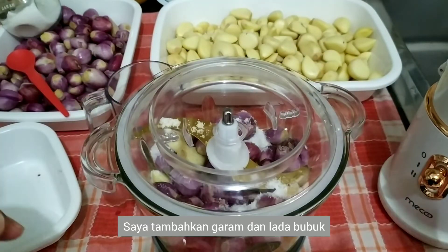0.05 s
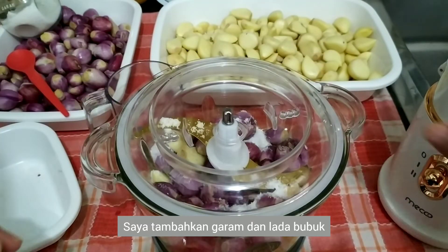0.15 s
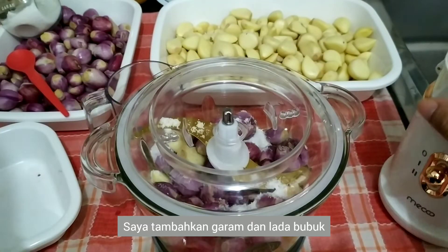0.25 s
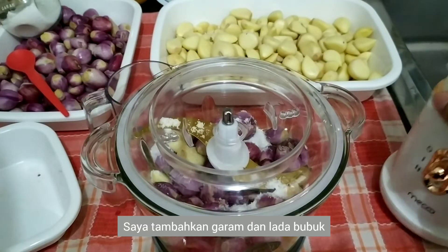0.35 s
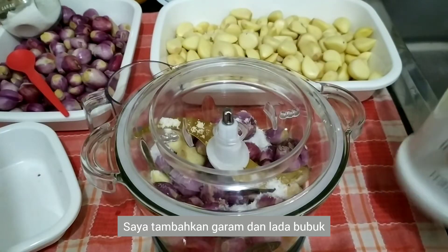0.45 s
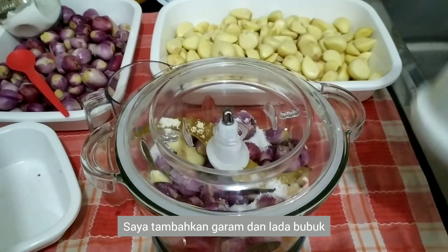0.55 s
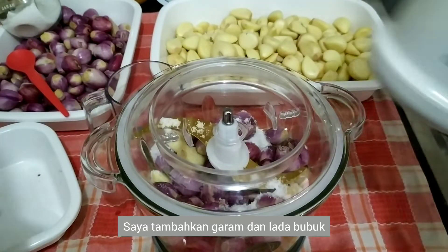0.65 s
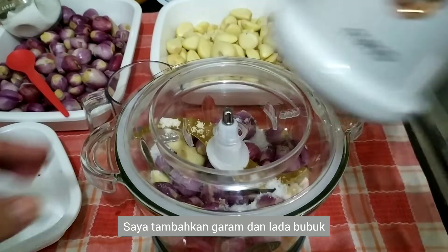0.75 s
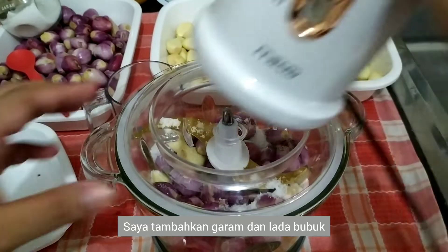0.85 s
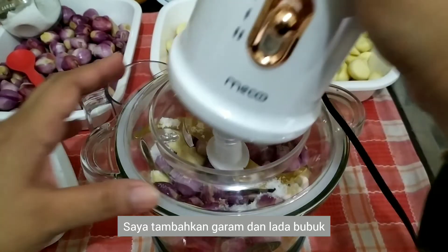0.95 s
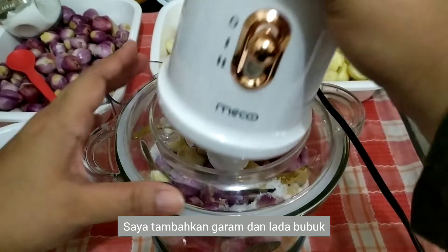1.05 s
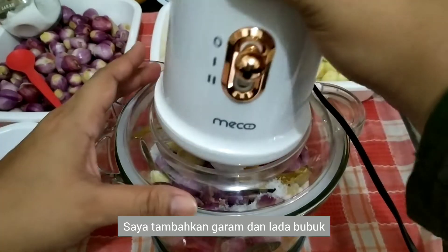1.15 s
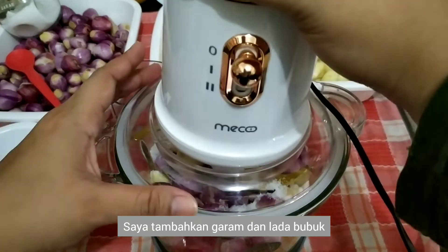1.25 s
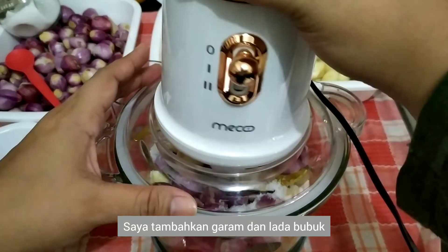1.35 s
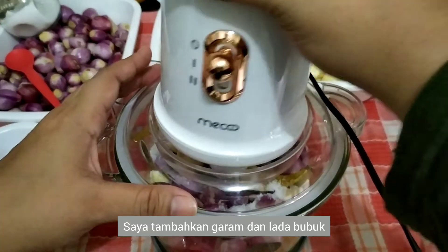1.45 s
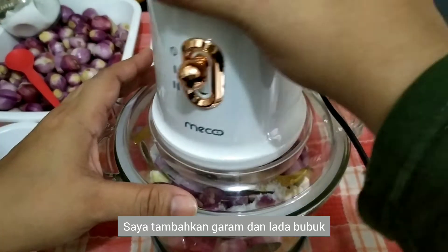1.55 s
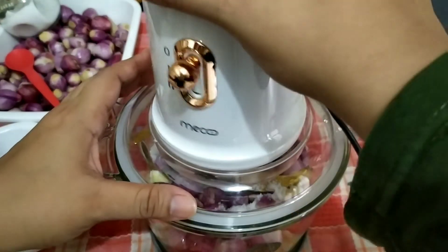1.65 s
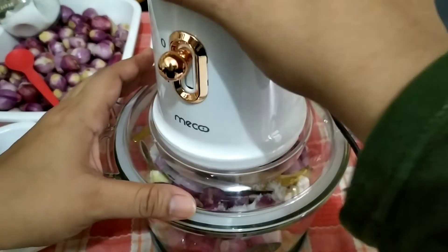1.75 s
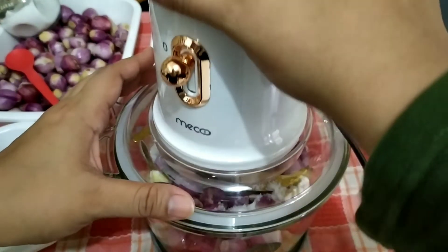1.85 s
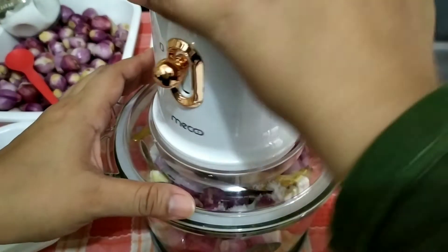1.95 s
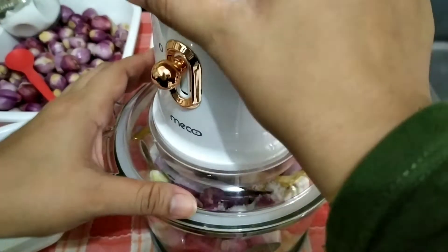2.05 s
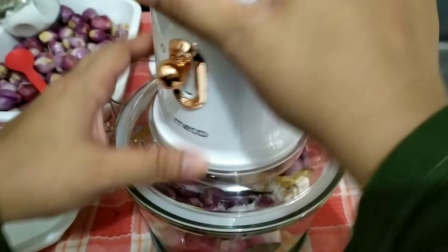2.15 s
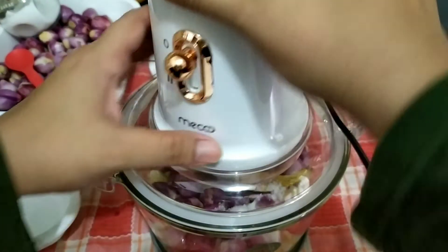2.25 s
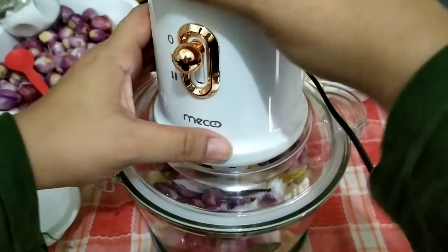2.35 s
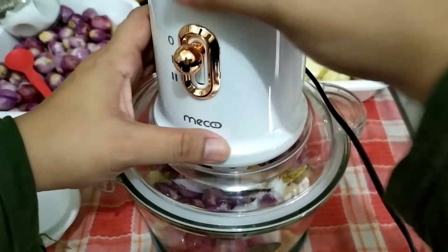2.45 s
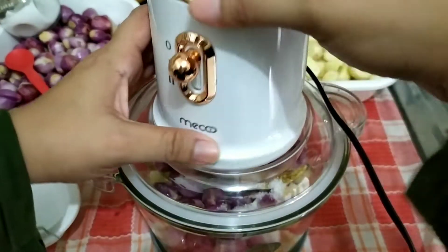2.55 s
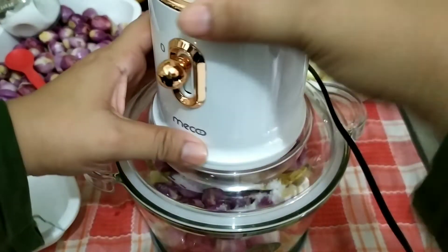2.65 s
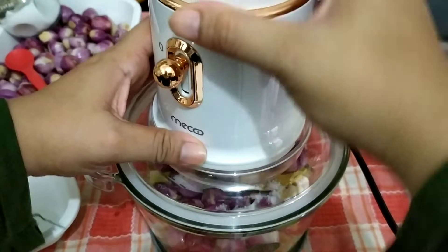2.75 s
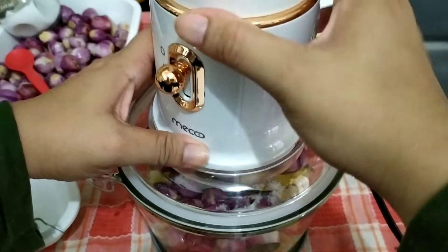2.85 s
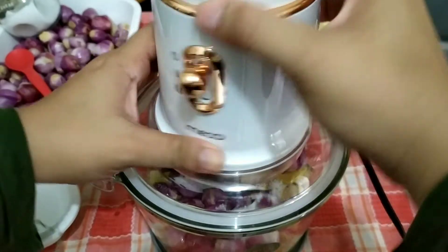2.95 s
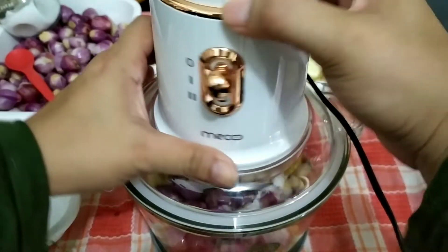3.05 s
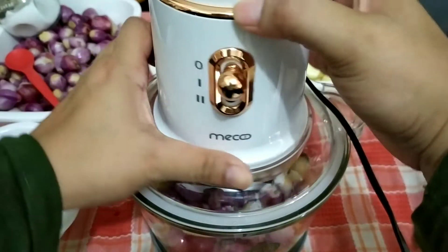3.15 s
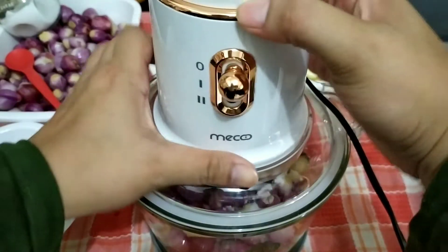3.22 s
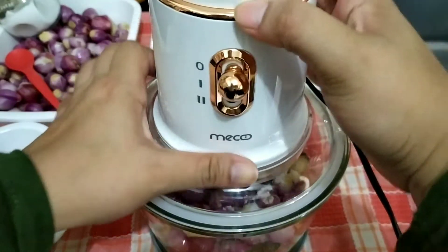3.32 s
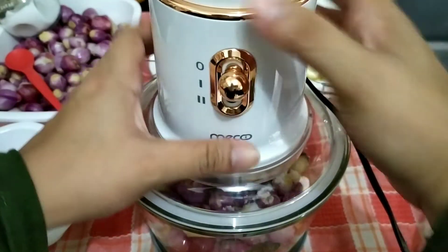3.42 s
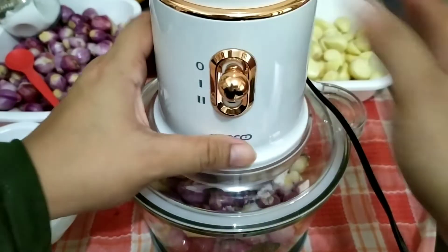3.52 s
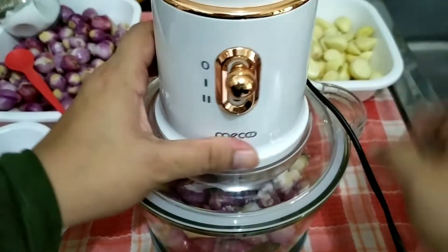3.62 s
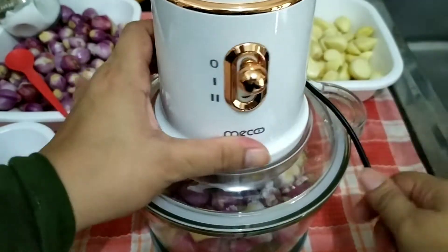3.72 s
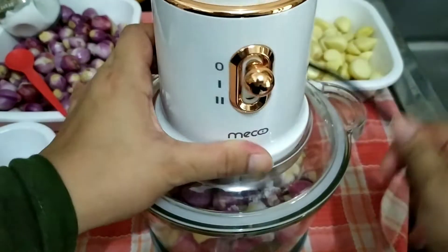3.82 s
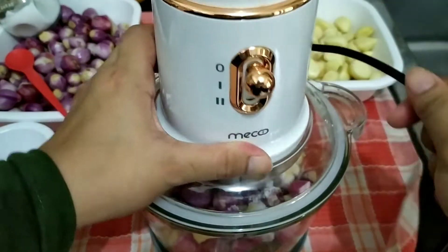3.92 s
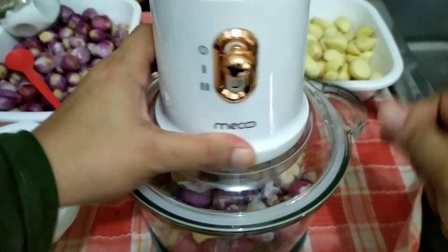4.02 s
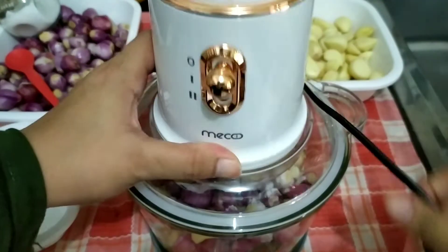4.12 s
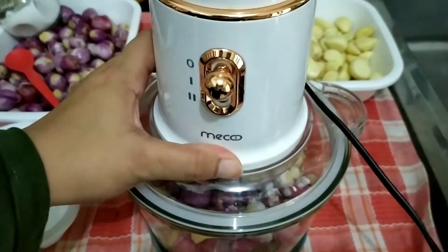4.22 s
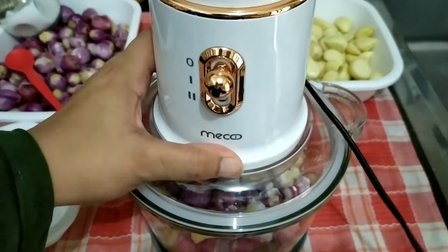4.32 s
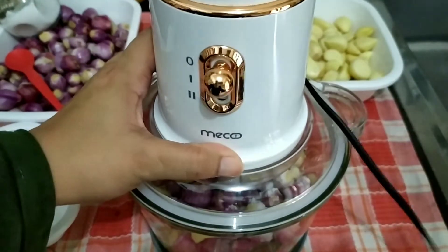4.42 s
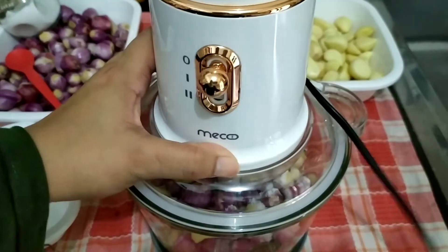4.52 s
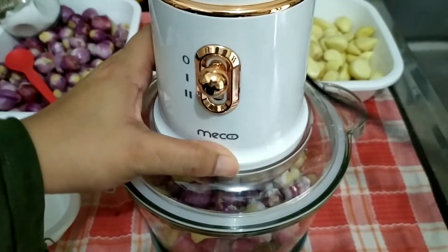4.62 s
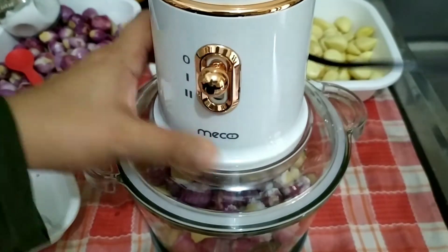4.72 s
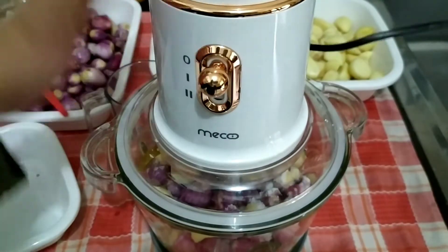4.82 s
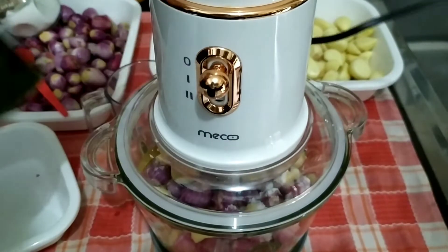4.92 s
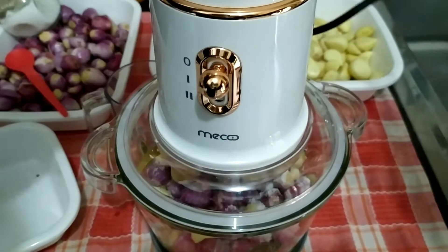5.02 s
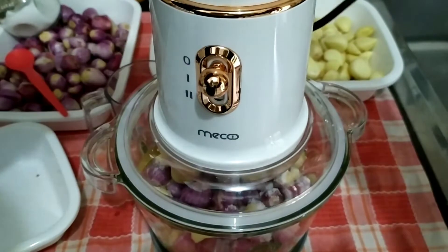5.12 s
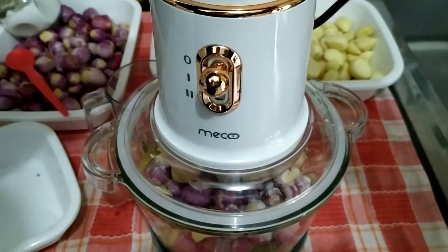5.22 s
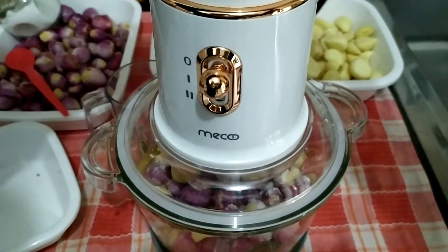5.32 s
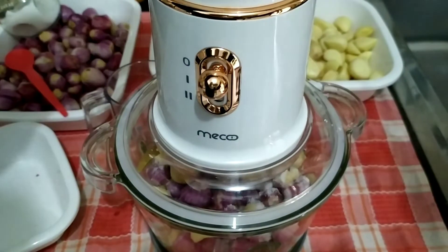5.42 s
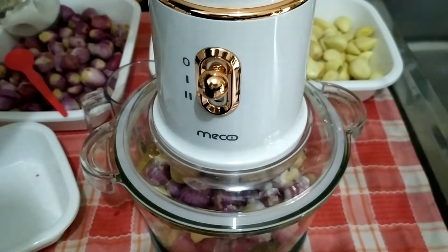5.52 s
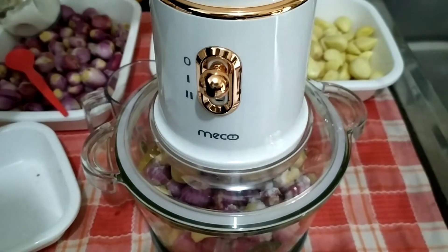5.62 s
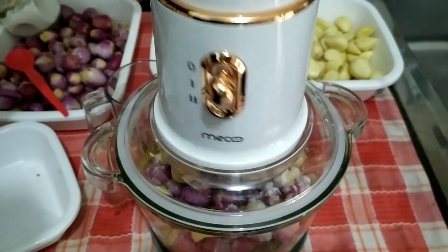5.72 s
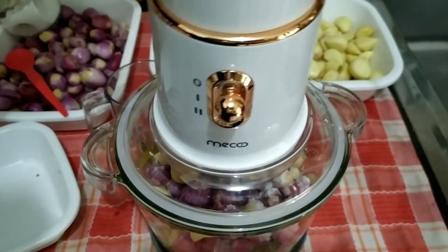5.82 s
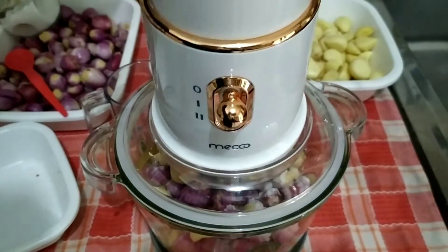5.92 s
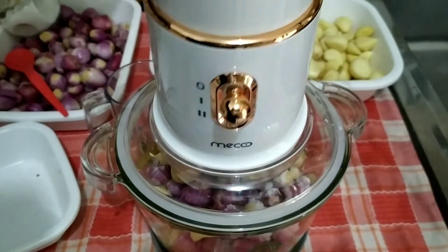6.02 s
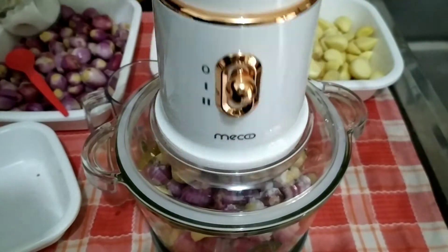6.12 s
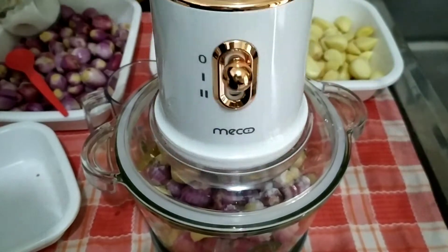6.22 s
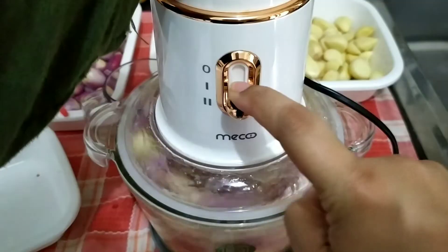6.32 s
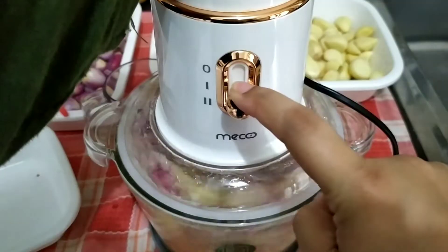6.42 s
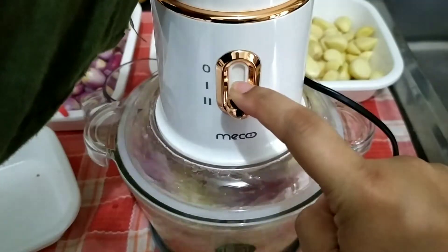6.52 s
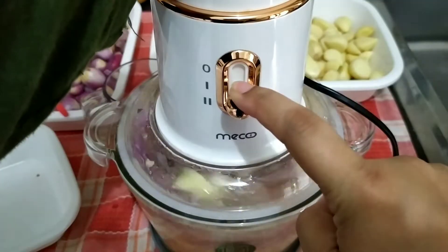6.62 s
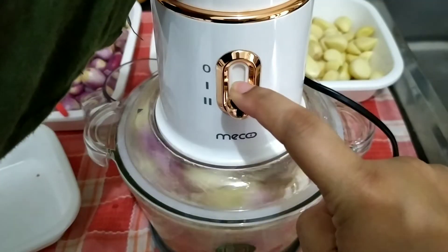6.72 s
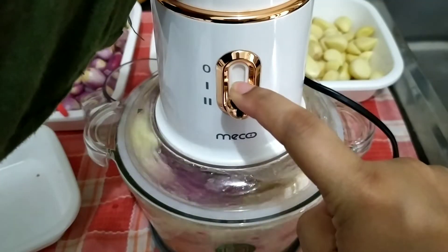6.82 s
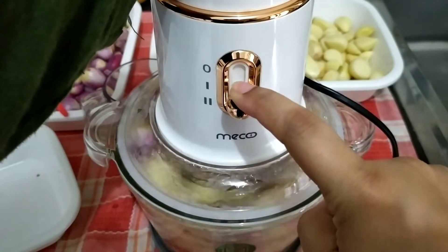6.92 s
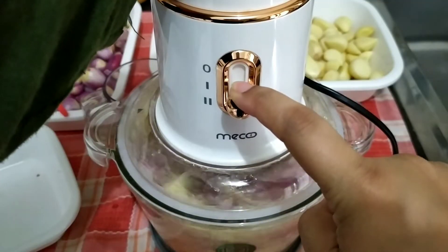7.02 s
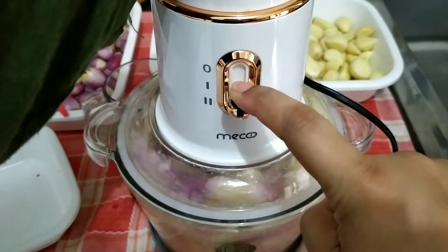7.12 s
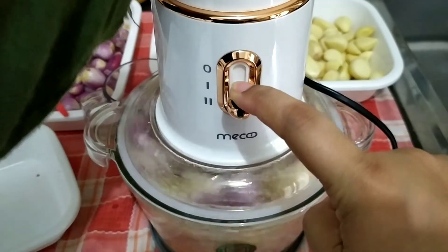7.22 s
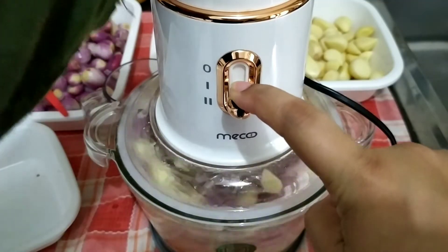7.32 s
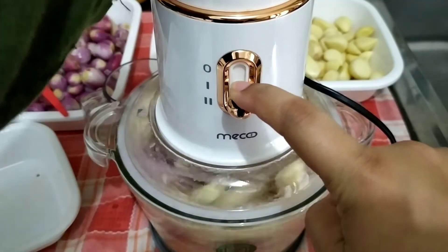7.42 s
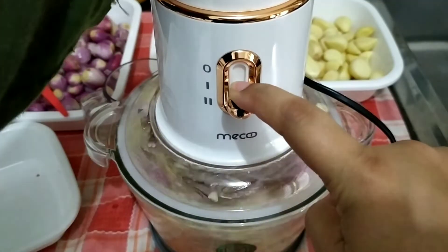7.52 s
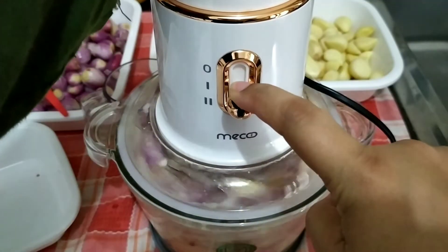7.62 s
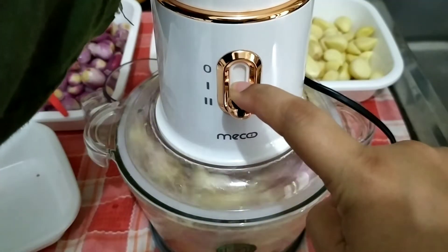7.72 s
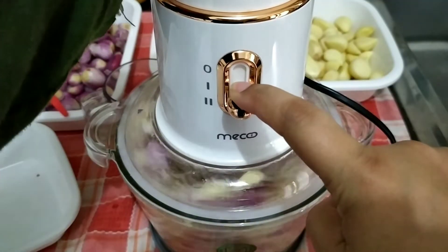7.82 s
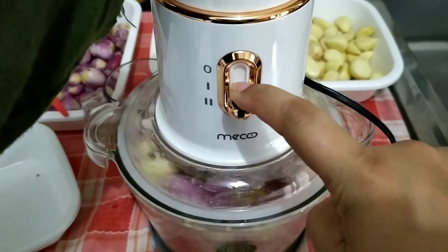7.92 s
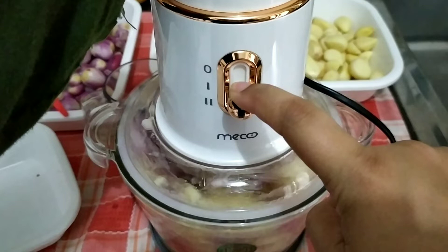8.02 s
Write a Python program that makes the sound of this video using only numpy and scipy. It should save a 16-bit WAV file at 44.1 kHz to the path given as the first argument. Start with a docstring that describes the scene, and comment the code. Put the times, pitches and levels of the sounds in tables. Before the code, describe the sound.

In a small kitchen with a faint mains hum, a plastic motor head is set on the lid of a glass bowl and twisted into place with close knocks, clacks and ticks. A finger squeaks faintly on it and a sleeve brushes by. After about six seconds a switch clicks and the electric chopper starts, its gears rasping while shallots and garlic rumble and pelt the bowl for the last two seconds.

```python
"""An electric chopper flings shallots and garlic round its glass bowl: a rumble and a pelting that
ease as the pieces shrink, over the rasp of the gears. It runs for the last two seconds or so.
Leading up to it, the plastic motor head is lifted, set on the lid and twisted until it seats: its wall
knocks and ticks, a finger squeaks on it, a sleeve brushes by, and the switch is pushed down.
Underneath lies a small kitchen, with still air, a faint mains hum and short echoes of the knocks."""
import sys
import numpy as np
from scipy import signal
from scipy.fft import rfft, irfft, next_fast_len
from scipy.io import wavfile

SR = 44100
rng = np.random.default_rng(int(sys.argv[2]) if len(sys.argv) > 2 else 0)


def put_to_file(sound):
    """Save the sound as 16-bit audio at rate SR, in the file named by the first command-line argument."""
    columns = np.atleast_2d(sound).T  # one column per channel
    safe = np.clip(columns, -1, 1)
    whole_steps = np.round(safe * 32767)
    wavfile.write(sys.argv[1], SR, whole_steps.astype(np.int16))


N = 355446
TIME = np.arange(N) / SR

# Levels are relative: each layer adds its own trim.
# room tone: f/Hz, level/dB
AIR_EQ = [(20, -26.5), (35, -19.5), (48, -0.5), (66, -9.5), (86, 3), (104, -4.5), (122, -11.5),
          (350, -15.5), (700, -15), (1200, -19.5), (3000, -22.5), (5500, -26.5), (7000, -34.5), (8300, -47),
          (10000, -63.5)]
# mains harmonics: f/Hz, level/dB
HUM = [(100, -65), (150, -79.5), (200, -86.5), (250, -77.5), (300, -82.5), (350, -78), (400, -90.5),
       (450, -77), (600, -84.5), (700, -80.5)]
# reverb decay: f/Hz, t60/s
KITCHEN_DECAY = [(120, 0.89), (320, 0.24), (840, 0.48), (2200, 0.36), (5800, 0.37), (9000, 0.3)]
# how well the small parts radiate into the room: f/Hz, gain/dB
SEND_EQ = [(100, -1), (300, -3), (700, 3.5), (1500, -1), (3000, 1.5), (8000, -1.5)]
# the room tone, heard almost in mono: f/Hz, left-right likeness
ROOM_TONE_LIKENESS = [(100, 0.99), (400, 0.73), (900, 0.96), (3000, 0.79), (9000, 0.86)]
# image of sound that fills the room: f/Hz, left-right likeness
ROOM_IMAGE = [(60, .9), (140, .96), (350, .8), (850, .6), (1600, .45), (3000, .3), (9000, .38)]
# image of close clacks and ticks: f/Hz, left-right likeness
CLOSE_IMAGE = [(300, 0.91), (1400, 0.93), (3000, 0.9), (8000, 0.37)]
# microphone balance: f/Hz, left minus right/dB
BALANCE = [(60, -0.5), (160, -0.8), (450, -0.9), (1200, -1.7), (3400, 0), (9000, 0.5)]

# head, lid and bowl ringing together on the table: f/Hz, level/dB, t60/s
BODY_MODES = [(97, -27, .12), (170, -15, .07), (200, -11, .1), (285, -7, .05), (330, 0, .018),
              (385, -11, .07), (440, -3, .016), (490, -16, .06), (575, -25, .05)]
# the plastic wall: multiple of its pitch, level/dB, t60/s
WALL_MODES = [(.5, 12.5, 0.014), (.76, 9.5, 0.0064), (.9, 4, 0.023), (0.999, 20, 0.018),
              (1.131, 1.5, 0.067), (1.4, 5.5, 0.041), (1.68, -1.5, 0.037)]
# a padded blow favours the middle modes: f/Hz, level/dB
THUD_EQ = [(50, -22), (110, -10), (190, 0), (480, 0), (640, -8), (950, -19), (2500, -30)]
# edge striking edge: f/Hz, level/dB
TICK_EQ = [(300, 10), (800, -7), (1500, -5), (2500, 0.5), (3600, 0), (5200, 1.5), (6500, -6.5),
           (7600, -18.5), (9300, -32), (10200, -72)]
# brushing cloth: f/Hz, level/dB
CLOTH_EQ = [(200, 12), (1000, 0.5), (2500, 0.5), (4500, 0.5), (6300, -3.5), (7600, -14), (9300, -32),
            (10200, -58)]

# hands, sleeve and cord brush past, and the lifted head scrapes: t/s, length/s, level/dB
BRUSHES = [(0.266, 0.044, -60), (0.372, 0.01, -48.5), (1.556, 1, -65), (2.312, 0.4, -61.5),
           (3.34, 0.11, -66.5), (4.027, 0.14, -58), (5.446, 0.49, -62.5), (5.87, 0.044, -57.5)]
# a finger slides on the housing: t/s, length/s, level/dB, f/Hz
SQUEAKS = [(2.116, 0.14, -62.5, 3950), (2.293, .05, -59.5, 3100), (2.395, 0.077, -60.5, 2850),
           (2.476, 0.043, -62, 2700)]
RUB_ATTACK_S, RUB_RELEASE_S = 0.027, 0.038
# a plastic edge catches and lets go: t/s, level/dB
TICKS = [(.278, -66), (.377, -50), (.421, -48), (0.46, -59), (.684, -61.5), (1.595, -57.5), (1.861, -59.5),
         (2.492, -52.5), (2.728, -60.5), (3.436, -62.5), (3.542, -59), (4.204, -58.5), (4.568, -63.5),
         (5.804, -44), (5.8868, -49.5), (6.209, -56.5)]
# the palm bumps and the bowl shifts on the tablecloth: t/s, level/dB
BUMPS = [(1.204, -44), (2.196, -38), (2.208, -36.5), (2.335, -34), (2.641, -43.5), (5.788, -42),
         (5.803, -33), (5.825, -37), (5.8855, -31), (6.209, -43)]
# head, lid, cord and switch knock together: t/s, force/dB, brightness/dB, wall pitch/Hz
KNOCKS = [(0.365, -50.5, 8, 1620), (.997, -47.5, -14.5, 1470), (1.642, -43.5, -12.5, 1280),
          (1.716, -48, 8, 1230), (1.9614, -44.5, -12, 1340), (2.2212, -37, -15, 1594),
          (2.351, -34, -14, 1574), (2.571, -44, -21.5, 1590), (2.764, -57, -4, 1450),
          (3.066, -45.5, -18.5, 1340), (3.128, -53, -1, 1550), (3.323, -58.5, 1, 1480),
          (3.641, -54, -0.5, 1280), (4.02, -45, -18.5, 1290), (4.075, -55, -19, 1280),
          (4.134, -48.5, -14, 1370), (4.164, -52, -14, 1540), (4.512, -56.5, -4, 1310),
          (6.131, -33.5, -14, 1665), (6.161, -40.5, -13, 1310), (6.276, -41, -2, 1250)]
# the head drops into a notch: t/s, force/dB, first rebound/dB, second rebound/dB, wall pitch/Hz
SEATINGS = [(1.1458, -34, 2, -4.5, 1480), (1.4745, -33.5, 0.5, -3.5, 1393), (1.755, -33, -2.5, -22, 1503),
            (2.949, -33.5, -8, -5.5, 1575)]
WALL_HZ = 1502  # the wall's usual pitch
# the head lands on the lid: t/s, level/dB; the glass rings: f/Hz, level/dB, t60/s
LANDING, GLASS_MODES = (1.16, -30.5), [(1340, 6, 0.038), (2284, -5.5, .044), (4650, -24, 0.3)]
# head and switch are pressed home: t/s, level/dB; the feet rock: f/Hz, level/dB, t60/s
PUSHES, FEET_MODES = [(1.764, -40), (6.134, -38), (6.164, -37)], [(96.2, 0, 0.33)]

# large pieces hit bowl and lid: t/s, force/dB, brightness/dB
CHUNKS = [(6.337, -34, 4.5), (6.35, -38.5, 8), (6.4303, -41, 12.5), (6.511, -41.5, -19),
          (6.834, -40.5, -13), (6.866, -45, 6), (7.425, -46, -22), (7.493, -34, 4), (7.795, -45.5, -28)]
# housing resonances under the running motor: f/Hz, width/Hz, level/dB
HOUSING_MODES = [(673, 5.1, -46), (964, 170, -45), (1621, 63, -45)]
# gear rasp: f/Hz, level/dB
GEAR_EQ = [(900, -8), (1850, -9), (2050, -5), (2250, -3.5), (2850, -5), (3400, -6.5), (3800, -11),
           (4450, -12.5), (5000, -10), (5800, -12.5), (6900, -17), (7700, -25.5), (9400, -40.5),
           (10200, -64)]
# rumble of the tumbling load: f/Hz, level/dB
TUMBLE_EQ = [(25, -32), (42, -15), (60, -6.5), (90, 6.5), (120, 7), (160, 3), (240, 4), (330, -1),
             (430, -5), (600, -6), (1200, -61)]
# the bowl pelted from inside: f/Hz, level/dB
BOWL_EQ = [(250, -28.5), (470, -5.5), (590, -1.5), (690, 5.5), (790, 7), (950, -7), (1130, -5.5),
           (1330, -11), (1580, 4.5), (1720, -8), (1850, -35), (2600, -9), (5000, -30), (9000, -72)]
# the load climbs the wall and showers the bowl: t/s, boost/dB
SURGES = [(6.32, 5), (6.5, 5.5), (6.93, 5), (7.16, 4), (7.45, 5), (7.7, 7), (8.03, 4.5)]
# fader moves of the running chopper: t/s, tumble/dB, rasp/dB
RUN_LEVELS = [(6.3, -40, -35.5), (6.382, -34, -38), (6.65, -32, -36.5), (7.894, -37.5, -36),
              (7.962, -36, -41), (8.05, -41.5, -37)]
MOTOR_ON_S = 6.282


def amp(db):
    """Decibels to gain."""
    return 10 ** (np.asarray(db) / 20)


def unit(x):
    """Scales to rms 1."""
    return x / np.sqrt(np.mean(x ** 2) + 1e-20)


def read(points, hz):
    """Reads a curve on a log-frequency axis."""
    f, value = np.transpose(points)
    return np.interp(np.log(hz + 1), np.log(f + 1), value)


def follow(rows):
    """Each column of an automation table at every sample."""
    s, *columns = np.transpose(rows)
    return [np.interp(TIME, s, c) for c in columns]


def add(mix, s, sound):
    """Mixes a sound in at time s."""
    part = mix[:, round(s * SR):][:, :sound.shape[-1]]
    part += sound[..., :part.shape[1]]


def colour(x, eq, size=4096):
    """Minimum-phase EQ."""
    log_gain = np.log(amp(read(eq, abs(np.fft.fftfreq(size, 1 / SR)))))
    taps = np.fft.ifft(np.exp(np.conj(signal.hilbert(log_gain)))).real[:size // 2]
    return signal.oaconvolve(x, taps[None], axes=1)[:, :x.shape[1]]


def stereo(x, image=ROOM_IMAGE):
    """Two unrelated signals become mid and side, with a width that depends on frequency."""
    size = next_fast_len(x.shape[1])
    a, b = rfft(x, size)
    likeness = np.clip(read(image, np.fft.rfftfreq(size, 1 / SR)), 0, 1)
    mid, side = np.sqrt((1 + likeness) / 2) * a, np.sqrt((1 - likeness) / 2) * b
    return irfft(np.array([mid + side, mid - side]), size)[:, :x.shape[1]]


def wander(per_s):
    """Slow random drift of rms 1."""
    return unit(np.interp(TIME * per_s, np.arange(4000), rng.standard_normal(4000)))


def impacts(per_s, spread_db):
    """A stereo spray of clicks of uneven size."""
    size = amp(spread_db * np.minimum(rng.exponential(1, N), 4))
    hits = rng.random(N) < per_s / SR
    return stereo(size * hits * rng.standard_normal((2, N)))


def ring(modes, t, detune=0, uneven_db=0):
    """Struck modes die away; grip and point of contact can shift and weight them anew for each blow."""
    chance = rng.standard_normal((len(modes), 2))
    return sum(amp(db + uneven_db * b - 60 * t / t60) * np.sin(2 * np.pi * hz * (1 + detune * a) * t)
               for (hz, db, t60), (a, b) in zip(modes, chance))


def fuzzy_tone(hz, width_hz):
    """Noise in a narrow resonance that follows hz."""
    r = np.exp(-np.pi * width_hz / SR)
    drift = signal.lfilter([1], [1, -2 * r, r * r], rng.standard_normal((2, N)))
    phase = 2 * np.pi * np.cumsum(hz * np.ones(N)) / SR
    return unit(drift[0] * np.cos(phase) + drift[1] * np.sin(phase))


def room_tone(air_db=-64.5, hum_db=-1.5):
    """The bed: still air and a mains hum that wavers and settles a hair lower."""
    air = unit(colour(stereo(rng.standard_normal((2, N)), ROOM_TONE_LIKENESS), AIR_EQ)) * amp(air_db)
    hum = sum(amp(db + hum_db) * np.sqrt(2) * np.sin(2 * np.pi * (hz * TIME + rng.random()))
              for hz, db in HUM)
    settle_db = 0.05 * np.maximum(3.2 - TIME, 0)
    return air + hum * amp(settle_db + 0.58 * wander(per_s=27))


def kitchen(x, early_db=-9, late_db=-10, early_t60=0.16, first_s=0.002):
    """Table and near walls answer within milliseconds; the tail rings on, longest in the bass."""
    t = np.arange(SR * 3 // 4) / SR
    taps = stereo(rng.standard_normal((2, len(t))) * (rng.random((2, len(t))) < 4000 / SR))
    early = taps[::-1, ::-1] * amp(-60 * t / early_t60)
    hz, age, bands = signal.stft(taps, SR, nperseg=256)
    decay = amp(-60 * age / read(KITCHEN_DECAY, hz)[:, None])
    late = signal.istft(bands * decay, SR, nperseg=256)[1][:, :len(t)]
    arrive = np.clip(t / first_s - 1, 0, 1)
    echo = amp(early_db) * unit(early * arrive) + amp(late_db) * unit(late * arrive)
    return signal.oaconvolve(x, echo / np.sqrt(len(t)), axes=1)[:, :N]


def varied_echoes(x, cycle_s=.9):
    """Three kitchen reverbs crossfade, so each knock's echo has a slightly different colour."""
    angle = 2 * np.pi * TIME / cycle_s
    return sum(kitchen(x * np.sqrt(2 / 3) * np.cos(angle + 2 * np.pi * k / 3)) for k in range(3))


def stroke(start, length):
    """Envelope of a rub: it swells, holds and lets go."""
    end = start + length
    return np.interp(TIME, [start - RUB_ATTACK_S, start, end, end + RUB_RELEASE_S], [0, 1, 1, 0])


def brushes(trim_db=-1):
    """Cloth and cord brush by in fine grains."""
    grains = unit(colour(impacts(per_s=9000, spread_db=1.5), CLOTH_EQ))
    envelope = sum(amp(db + trim_db) * stroke(s, length) for s, length, db in BRUSHES)
    return grains * envelope * amp(1.8 * wander(per_s=8.3))


def squeaks(trim_db=-1, sag_hz_per_s=1900):
    """Skin sticks and slips on the plastic, dropping in pitch as it slows."""
    starts, _, _, pitches = np.transpose(SQUEAKS)
    latest = np.maximum(np.searchsorted(starts - RUB_ATTACK_S, TIME) - 1, 0)
    hz = pitches[latest] - sag_hz_per_s * (TIME - starts[latest])
    envelope = sum(amp(db + trim_db) * stroke(s, length) for s, length, db, _ in SQUEAKS)
    return fuzzy_tone(hz, width_hz=480) * envelope


def blow(s, force_db, bright_db, hz=WALL_HZ):
    """A harder contact trades thud for tick. Gives t/s, thud/dB, clack/dB, tick/dB, wall pitch/Hz."""
    return s, force_db - bright_db / 2, force_db - 1, force_db + bright_db / 2, hz


def strikes(blows, thud_db, clack_db, tick_db, contact_s, bowl_db, bowl_below_hz=310, full_blow_db=-23):
    """Three layers to a hit: the whole body thuds, the wall clacks and the edge ticks."""
    t = np.arange(8192) / SR
    push = 1 - np.exp(-(t / contact_s) ** 2)  # the heavy parts take a moment to get moving
    snap = t * np.exp(-t / .0007) + .00002 * np.exp(-t / .005)  # a sharp crack, then faint chatter
    out = np.zeros((2, N))
    for s, thud, clack, tick, hz in blows:
        bass_db = bowl_db + 0.25 * min(thud - full_blow_db, 0)  # light blows stir the heavy bowl less
        body_modes = [(f, db + bass_db * (f < bowl_below_hz), t60) for f, db, t60 in BODY_MODES]
        body = colour(push * ring(body_modes, t, detune=.03, uneven_db=1.5)[None], THUD_EQ)
        wall_modes = [(k * hz, db, t60) for k, db, t60 in WALL_MODES]
        wall_rings = [ring(wall_modes, t, detune=0.045, uneven_db=4.5) for _ in range(2)]
        wall = stereo(np.array(wall_rings), CLOSE_IMAGE)
        edge = colour(stereo(rng.standard_normal((2, len(t))), CLOSE_IMAGE) * snap, TICK_EQ)
        for layer, db in (body, thud + thud_db), (wall, clack + clack_db), (edge, tick + tick_db):
            attack_rms = np.sqrt(np.mean(layer[:, :265] ** 2))  # first 6 ms
            add(out, s, amp(db) * layer / attack_rms)
    return out


def ticks(twist_s=(1.2, 1.5), creaks_per_s=8, creak_db=-67):
    """Plastic edges catch, and creak faintly at random while the head is turned."""
    start, end = twist_s
    chances = rng.random((round((end - start) * creaks_per_s), 2))
    creaks = [(start + (end - start) * when, creak_db + 10 * (size - .5)) for when, size in chances]
    blows = [(s, db, db, db, WALL_HZ) for s, db in TICKS + creaks]
    return strikes(blows, thud_db=-27, clack_db=-4.5, tick_db=5, contact_s=.0008, bowl_db=-2)


def bumps():
    """A padded push moves the whole bowl and hardly rings the wall."""
    blows = [(s, db, db, db, WALL_HZ) for s, db in BUMPS]
    return strikes(blows, thud_db=-5, clack_db=-21, tick_db=-27, contact_s=0.0012, bowl_db=10)


def knocks():
    """Plastic parts meet in single hits, light in the bass."""
    blows = [blow(*row) for row in KNOCKS]
    return strikes(blows, thud_db=-2.5, clack_db=-1.5, tick_db=4.5, contact_s=0.00085, bowl_db=-5)


def seatings(drop_bright_db=-26.5, rebound_s=(.009, .0145), rebound_bright_db=(-17.5, 1.5)):
    """The head drops dully into a notch; two rebounds, each sharper, drive the heavy bowl."""
    drops = [blow(s, force, drop_bright_db, hz) for s, force, _, _, hz in SEATINGS]
    rebounds = [blow(s + delay, force + db, bright, hz) for s, force, first, second, hz in SEATINGS
                for delay, db, bright in zip(rebound_s, (first, second), rebound_bright_db)]
    return (strikes(drops, thud_db=-5.5, clack_db=-3.5, tick_db=6.5, contact_s=0.0012, bowl_db=-2)
            + strikes(rebounds, thud_db=-3.5, clack_db=-2, tick_db=3.5, contact_s=0.00095, bowl_db=0.5))


def glass_and_feet():
    """A hard landing rings the glass; a push from above rocks the chopper on its feet."""
    t, out = np.arange(SR // 3) / SR, np.zeros((2, N))
    add(out, LANDING[0], amp(LANDING[1]) * ring(GLASS_MODES, t))
    for s, db in PUSHES:
        add(out, s, amp(db) * ring(FEET_MODES, t))
    return out


def chunks():
    """Large pieces strike the bowl from inside."""
    blows = [blow(*row) for row in CHUNKS]
    return strikes(blows, thud_db=0, clack_db=0, tick_db=1, contact_s=.001, bowl_db=3)


def drive(turns, rasp_db, clumps, gear_db=2, housing_db=-4):
    """The gears rasp, with a slight pulse once a shaft turn, and the housing whines along."""
    teeth = stereo(rng.standard_normal((2, N))) * (1 + 0.04 * np.cos(2 * np.pi * turns))
    gears = unit(colour(teeth, GEAR_EQ)) * amp(rasp_db + gear_db + 1.18 * clumps)
    whine = sum(amp(db + housing_db) * fuzzy_tone(hz, width) for hz, width, db in HOUSING_MODES)
    return gears + whine * amp(rasp_db - rasp_db.max())


def food(blade_turns, running_s, tumble_db, clumps, pelt_db=-36.5, fade_db_per_s=3.5, surge_s=0.064):
    """Two blades sweep the load round: it rumbles and pelts the bowl, softer as the pieces shrink."""
    sweep = 1 + 0.45 * np.cos(2 * np.pi * 2 * blade_turns)
    rumble = unit(colour(impacts(per_s=1100 * sweep, spread_db=-3), TUMBLE_EQ))
    pelting = unit(colour(impacts(per_s=2500 * sweep, spread_db=2.2), BOWL_EQ))
    surge_db = sum(db * np.exp(-((TIME - s) / surge_s) ** 2) for s, db in SURGES)
    pelting_db = pelt_db - fade_db_per_s * running_s + surge_db
    return rumble * amp(tumble_db + 0.19 * clumps) + pelting * amp(pelting_db + 0.7 * clumps)


def chopper(shaft_hz=377.9, spin_up_s=.02, gear_ratio=10.4, fade_in_s=.006):
    """The motor snaps up to speed and drives the geared-down blades through the food."""
    tumble_db, rasp_db = follow(RUN_LEVELS)
    running_s = np.maximum(TIME - MOTOR_ON_S, 0)
    speed_hz = shaft_hz * (1 - np.exp(-running_s / spin_up_s)) * (1 + 0.014 * wander(per_s=14))
    turns = np.cumsum(speed_hz) / SR
    clumps = wander(per_s=55)  # the food reaches the blades in lumps
    sound = food(turns / gear_ratio, running_s, tumble_db, clumps) + drive(turns, rasp_db, clumps)
    return sound * np.clip(running_s / fade_in_s, 0, 1)


def scene():
    """Handling, then chopping, over room tone; only the hits and rubs feed the reverb."""
    steady = chopper() + room_tone()
    rubs = squeaks() + brushes()
    head_pan = amp([[-0.75], [0.75]])  # a little to the right
    handling = (seatings() + knocks() + bumps() + glass_and_feet()) * head_pan
    close = handling + rubs + chunks() + ticks()
    return close + varied_echoes(colour(close, SEND_EQ)) + steady


def record(dry, low_cut_hz=48, high_cut_hz=9780):
    """A small microphone leans slightly right and drops the deep bass and the top end."""
    size = next_fast_len(N)
    balance_db = read(BALANCE, np.fft.rfftfreq(size, 1 / SR))
    heard = irfft(rfft(dry, size) * amp(np.array([balance_db, -balance_db]) / 2), size)[:, :N]
    heard = signal.sosfilt(signal.butter(2, low_cut_hz, "high", fs=SR, output="sos"), heard)
    high_cut = signal.firwin(301, high_cut_hz, window=("kaiser", 9), fs=SR)
    return signal.oaconvolve(heard, high_cut[None], "same", axes=1)


dry = scene()
out = record(dry)
put_to_file(out)
```